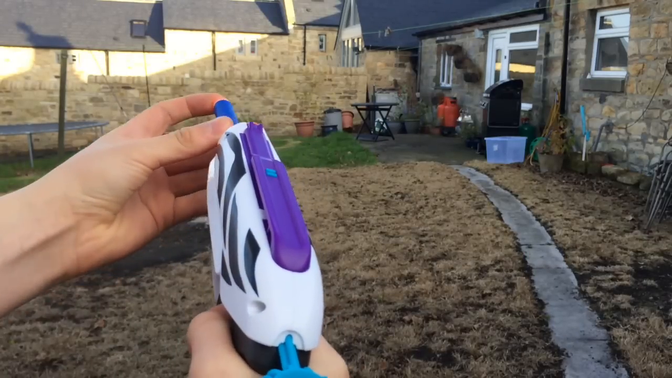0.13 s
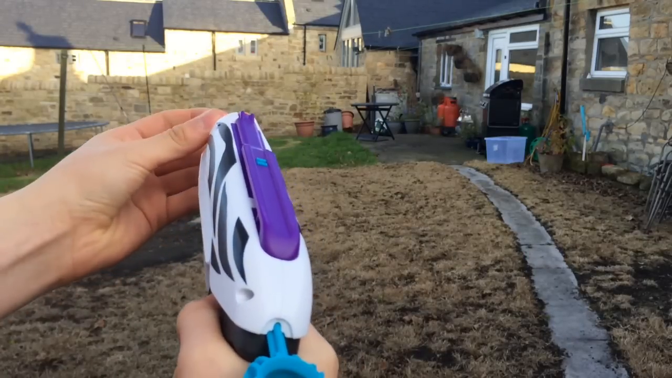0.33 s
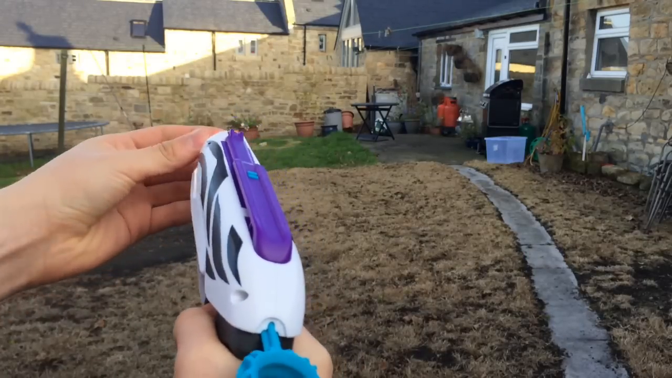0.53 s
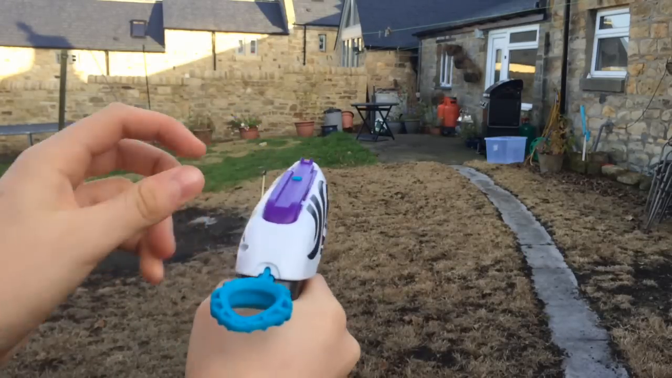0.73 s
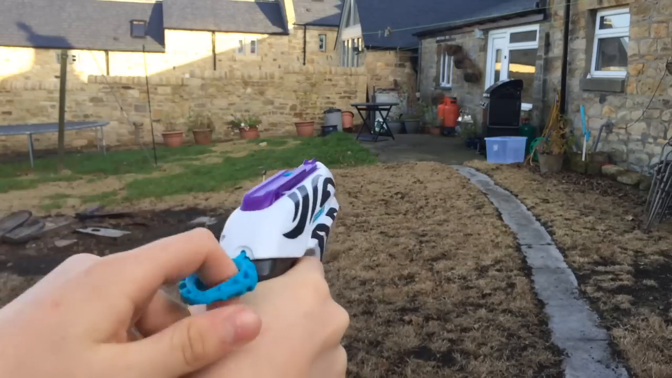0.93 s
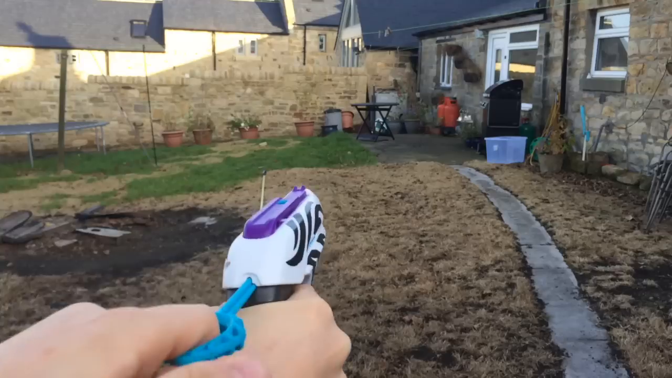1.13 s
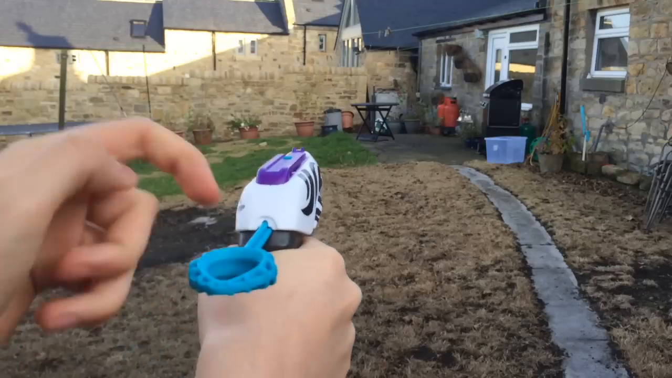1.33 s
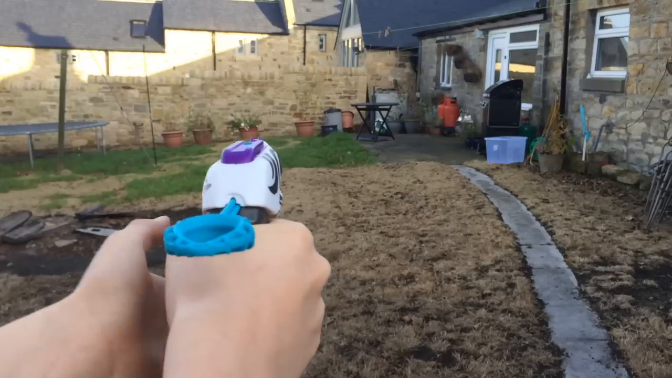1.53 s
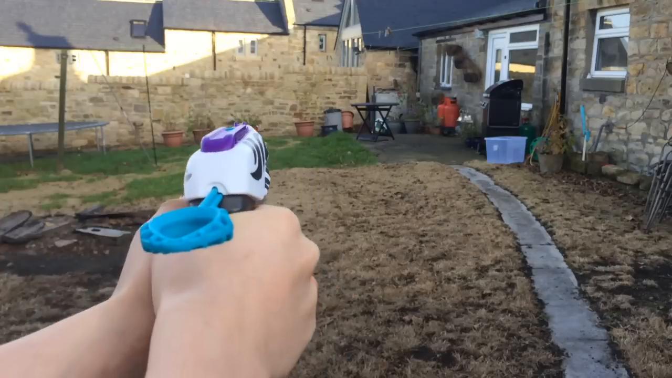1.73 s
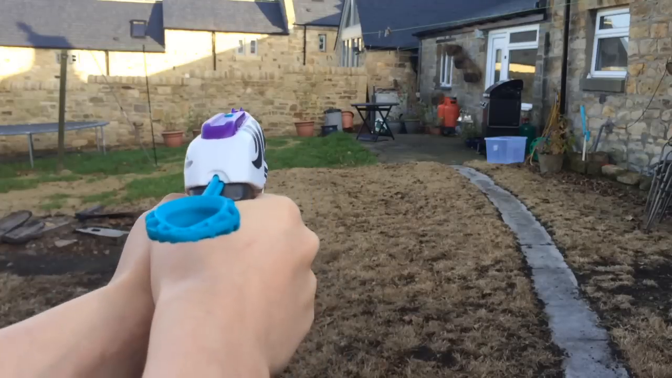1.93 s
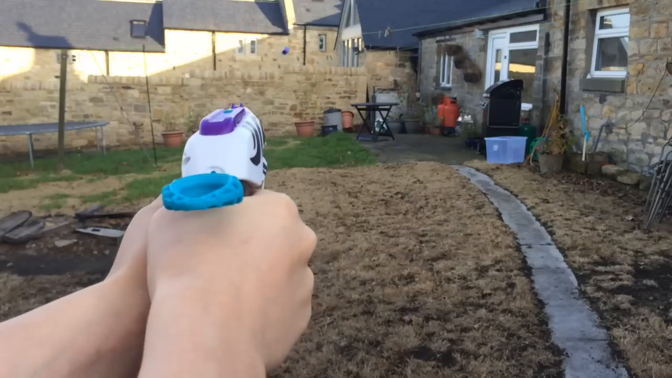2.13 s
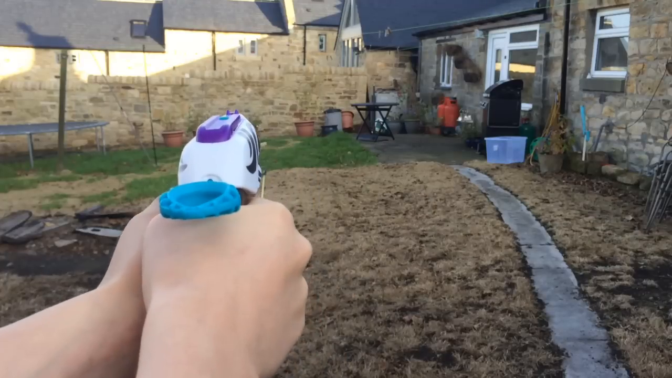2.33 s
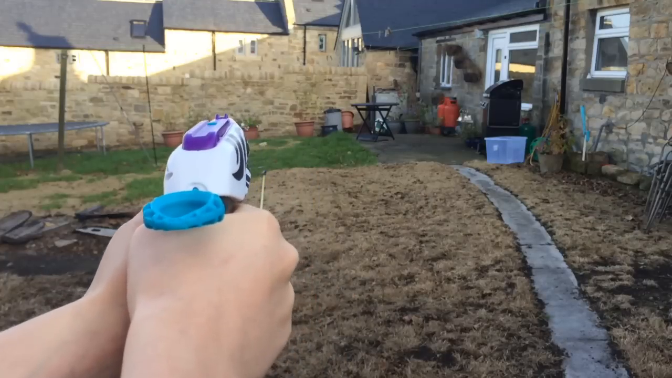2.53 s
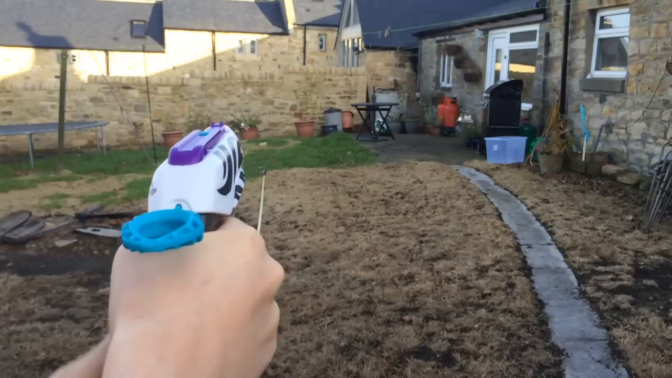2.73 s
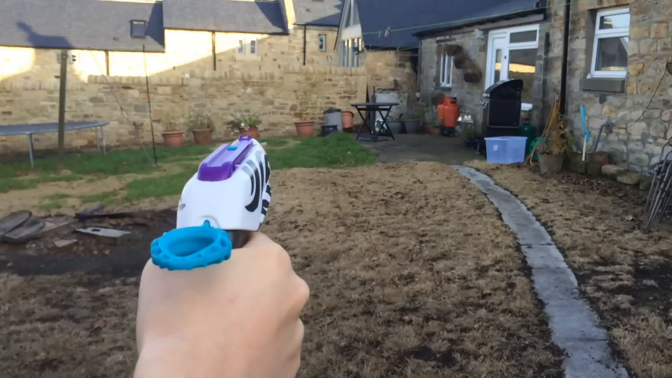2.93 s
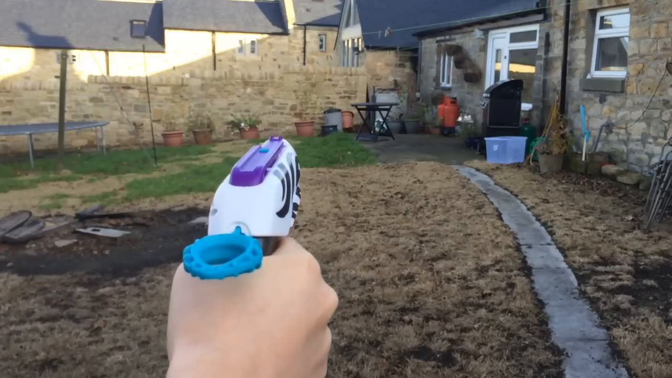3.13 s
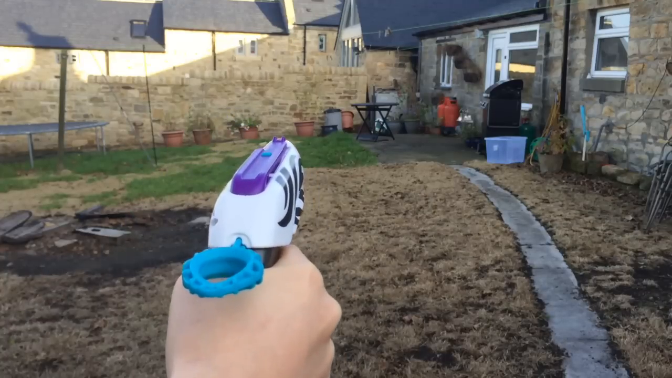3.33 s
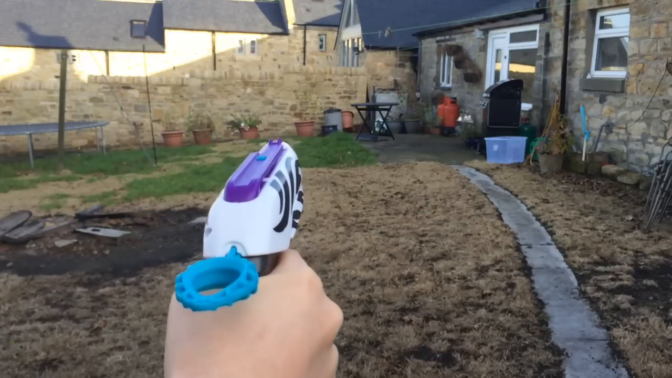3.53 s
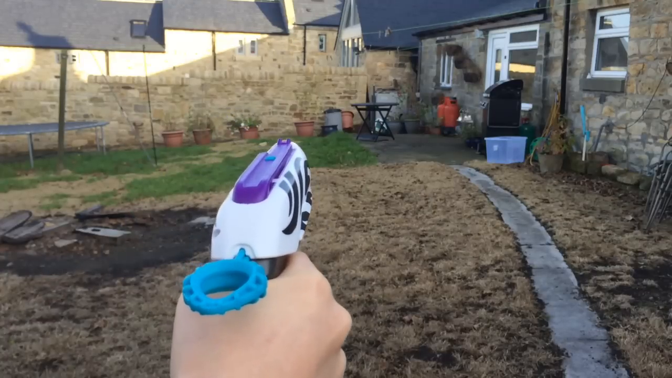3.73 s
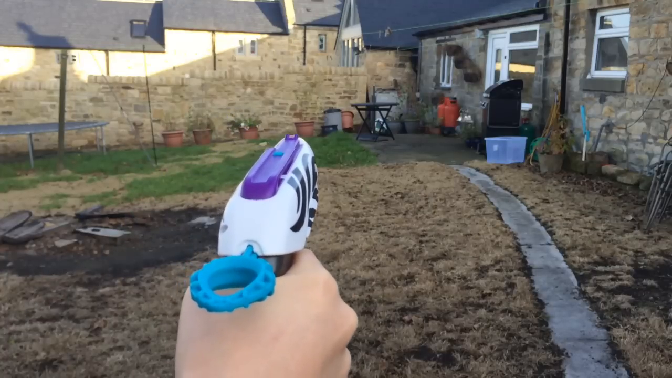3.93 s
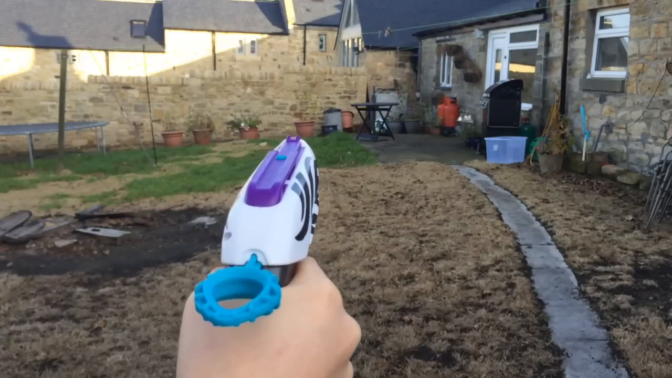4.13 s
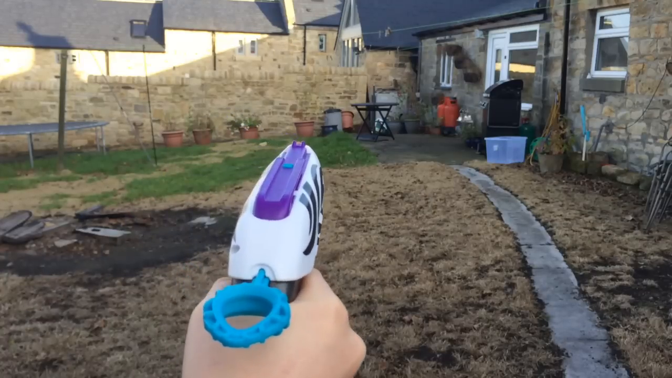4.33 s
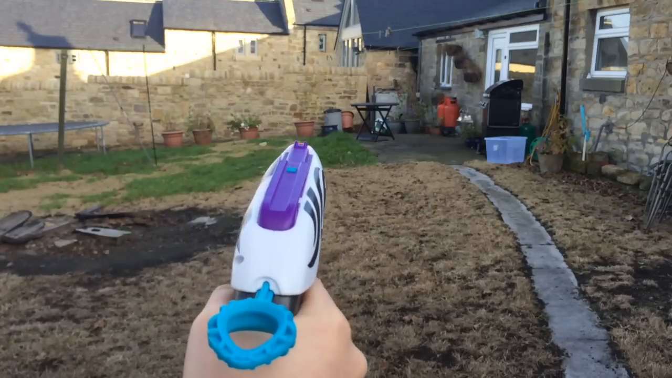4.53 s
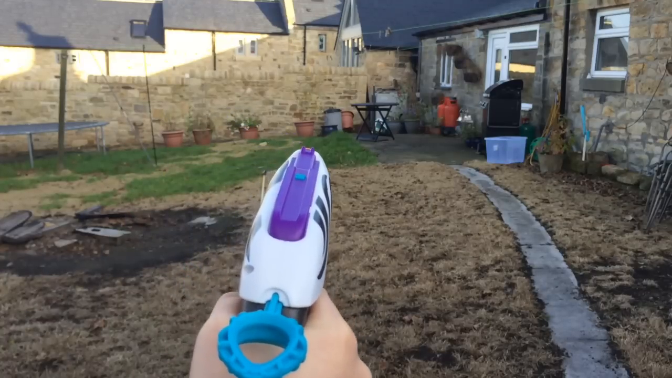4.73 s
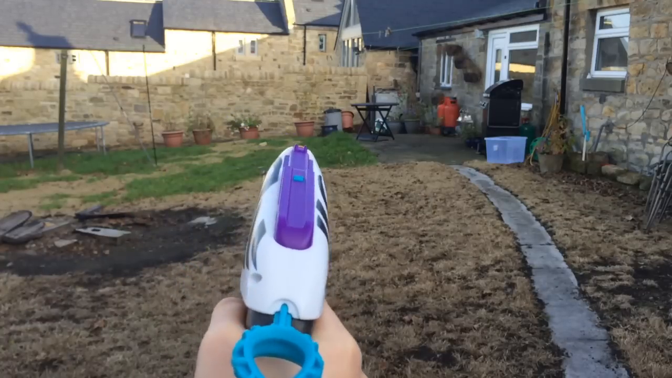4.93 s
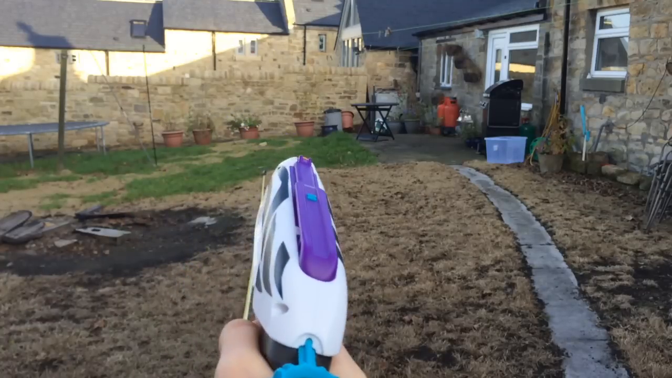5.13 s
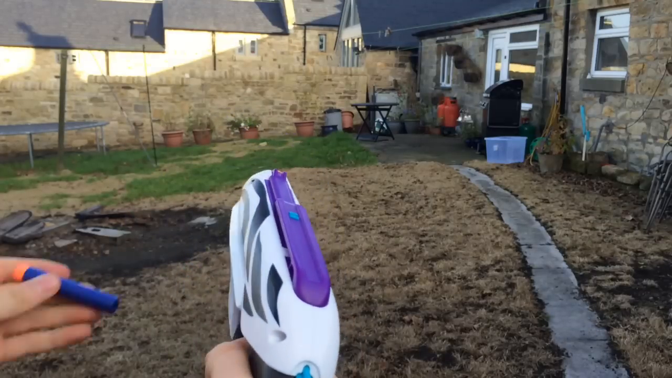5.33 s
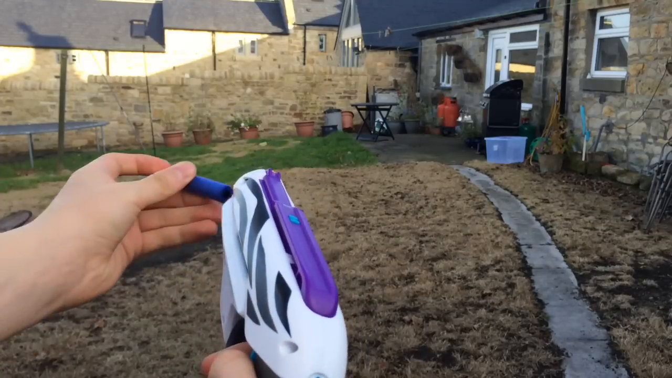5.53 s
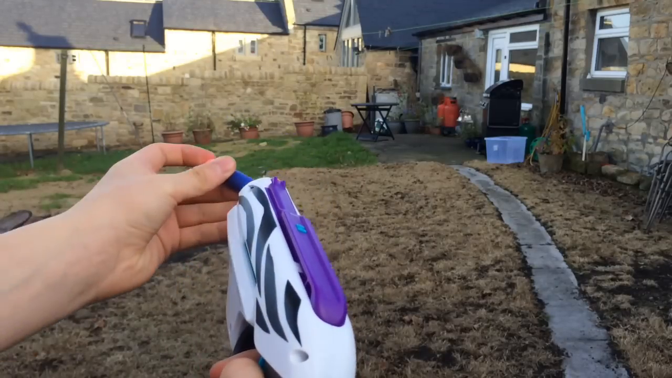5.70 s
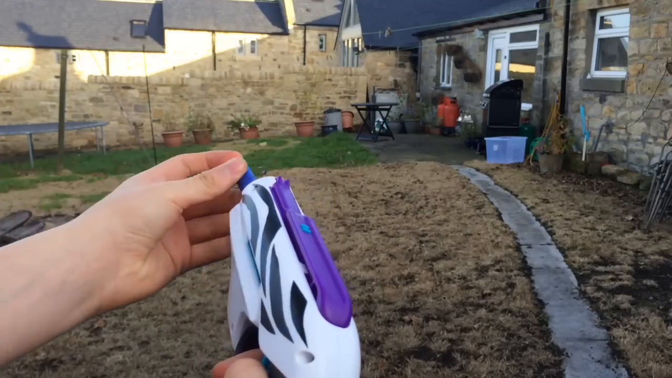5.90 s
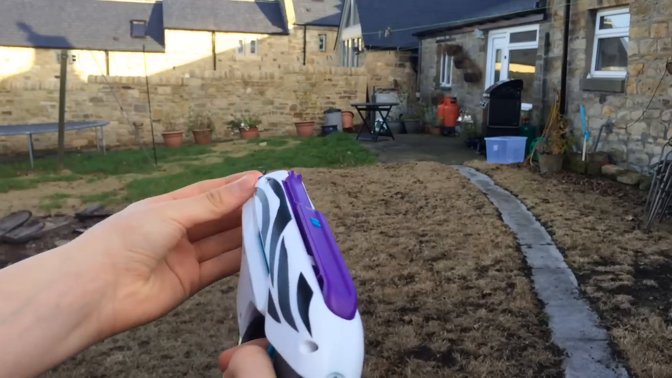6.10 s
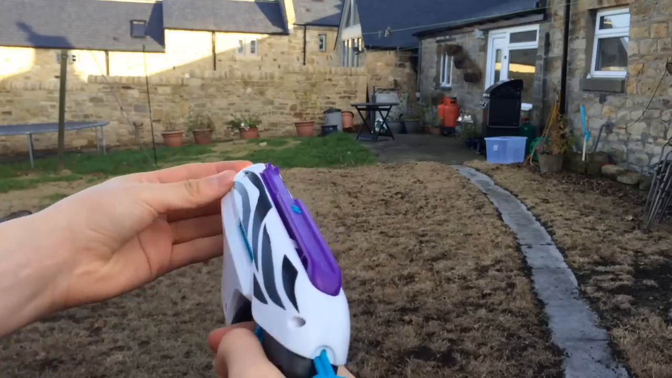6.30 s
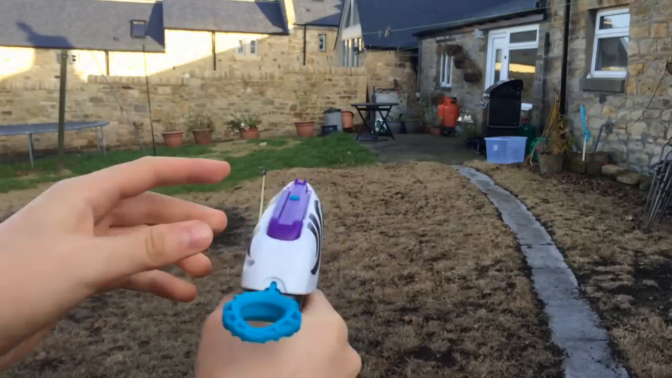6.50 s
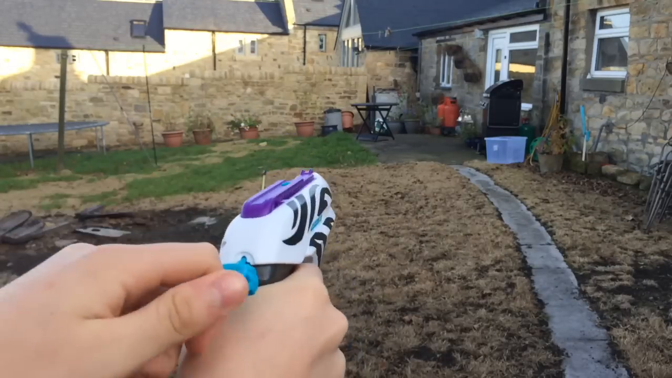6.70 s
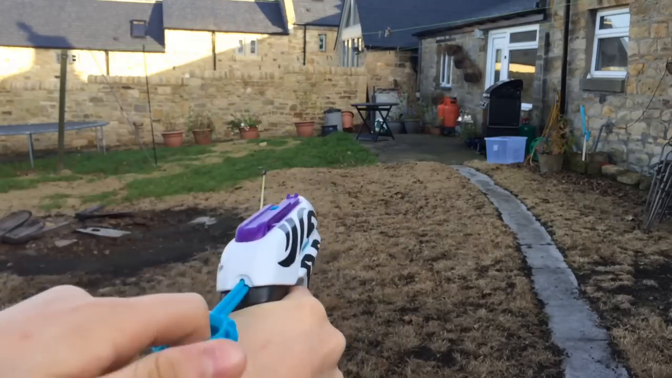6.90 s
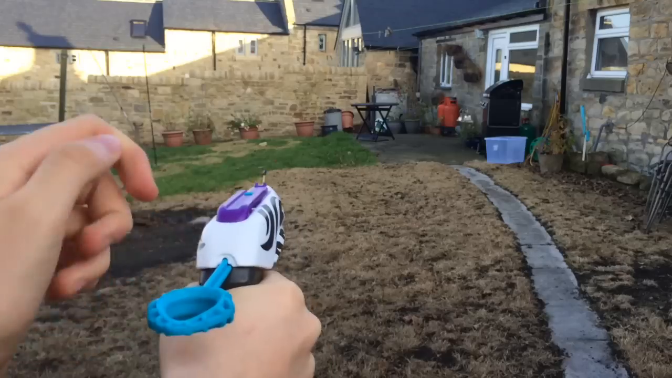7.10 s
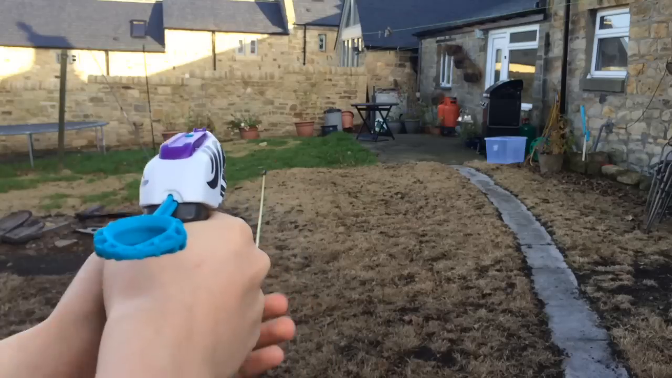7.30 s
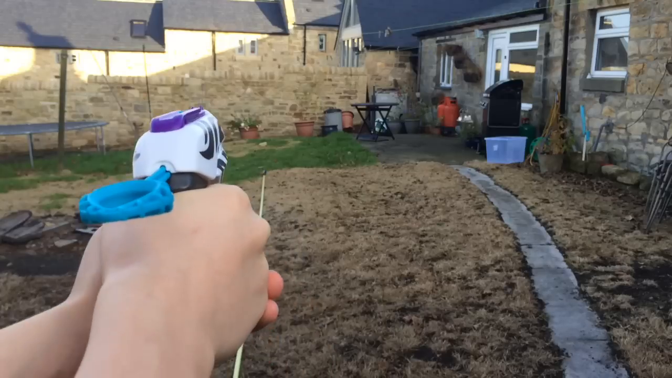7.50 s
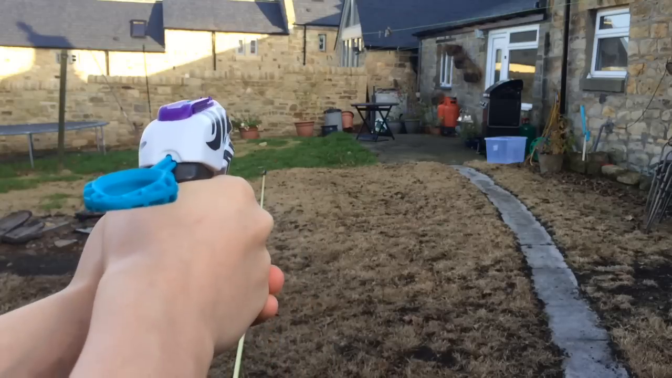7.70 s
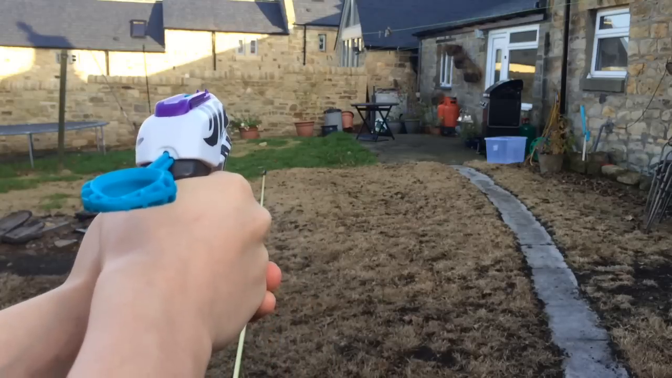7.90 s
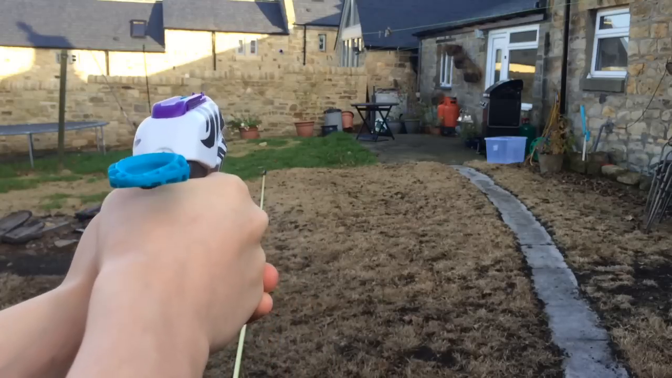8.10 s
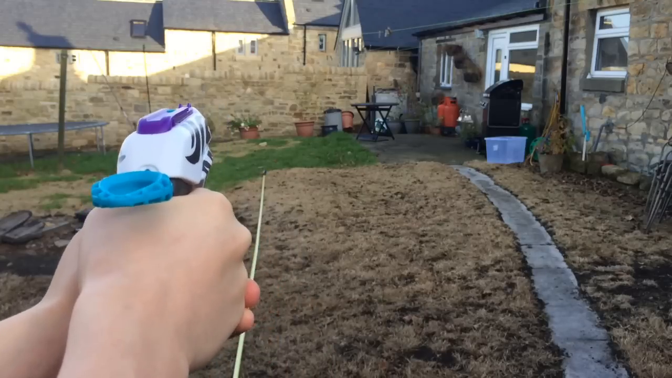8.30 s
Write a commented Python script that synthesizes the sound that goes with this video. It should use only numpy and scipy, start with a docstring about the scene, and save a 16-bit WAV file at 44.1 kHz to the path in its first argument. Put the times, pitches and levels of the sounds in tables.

```python
"""In a walled garden, far traffic hums while fingers rub, tap and load a plastic dart blaster close by.
A rod is pulled back against the spring, scraping until the catch clacks twice. At 2.2 s the blaster
fires: the plunger slams, air pops out and the spring rings on. A second later the dart lands far off.
After more handling comes a second pull at 6.9 s and a second shot at 8.1 s.
The stone walls answer the taps, clacks and shots."""
import sys
import numpy as np
from scipy import signal
from scipy.fft import rfft, irfft, next_fast_len
from scipy.io import wavfile
from scipy.ndimage import uniform_filter1d, map_coordinates

SR = 44100
rng = np.random.default_rng(int(sys.argv[2]) if len(sys.argv) > 2 else 0)


def generate_wav(sig):
    """Save sig (samples, or channels by samples) to the path in sys.argv[1] as 16-bit PCM at SR."""
    pcm = np.round(np.clip(np.atleast_2d(sig).T, -1, 1) * 32767).astype(np.int16)
    wavfile.write(sys.argv[1], SR, pcm)


N = 368235

# pulls on the rod: (time of the first clack [s], strength [dB], time stretch [factor])
PULLS = [(1.2034, 0.5, 1.05), (6.9339, 0, .95)]
# shots: (time the plunger is let go [s], strength [dB])
SHOTS = [(2.1847, 0), (8.0982, -0.6)]


def amp(db):
    """Turn decibels into a gain."""
    return 10 ** (np.asarray(db) / 20)


def unit(x):
    """Scale a signal to an average (rms) level of 1."""
    return x / np.sqrt(np.mean(x ** 2) + 1e-20)


def along(points, hz):
    """Read between (frequency, value) points on a log frequency axis."""
    freqs, values = np.transpose(points)
    return np.interp(np.log(hz + 1), np.log(freqs + 1), values)


def wobble(rate):
    """A smooth curve through `rate` random values a second."""
    return map_coordinates(rng.standard_normal(int(N * rate / SR) + 4), [np.arange(N) * rate / SR])


def filtered(x, response):
    """Filter x by a response given as a function of frequency."""
    size = next_fast_len(len(x) + 8192)
    return irfft(rfft(x, size) * response(np.fft.rfftfreq(size, 1 / SR)), size)[:len(x)]


def resonances(modes):
    """The response of a body that rings at each (pitch, width, level)."""
    return lambda f: sum(amp(db) * 1j * f * width / (hz * hz - f * f + 1j * f * width)
                         for hz, width, db in modes)


def hiss(spectrum):
    """Noise of level 1, shaped by (frequency, level) points."""
    return unit(filtered(rng.standard_normal(N), lambda hz: amp(along(spectrum, hz))))


def background():
    """Far traffic swells slowly; a breeze nudges the microphone, which hisses."""
    # traffic loudness: (time [s], rumble [dB], road hiss [dB])
    traffic = [(0.0, -59.5, -63.5), (1.0, -57.5, -61), (1.799, -60.5, -61.5), (2.44, -59, -64),
               (2.75, -59, -60.5), (3.5, -59.5, -61), (4.4, -59.5, -64.5), (5.6, -61, -66.5),
               (6.07, -58.5, -61.5), (6.5, -60.5, -65), (7.501, -61.5, -63.5), (8.35, -60.5, -64)]
    # tyre whine of single cars: (time when nearest [s], level [dB], fade [dB/s])
    passes = [(1.101, -70.5, 24), (3.49, -65.5, 44.5), (6.1, -68, 34.5), (6.95, -75.5, 15)]
    # tone colour of each noise: (frequency [Hz], relative level [dB])
    rumble_tone = [(30, -19.5), (55, -6), (110, -4), (150, -3.5), (195, -1.5), (235, -10.5), (450, -20.5),
                   (600, -44.5)]
    road_tone = [(150, -30.5), (260, -7.5), (420, -6), (600, -8), (780, -6), (950, -2), (1350, -5),
                 (2000, -12.5), (2600, -21), (4000, -25), (5500, -50)]
    whine_tone = [(1500, -38.5), (1900, 0), (2200, 2), (2550, -6.5), (3000, -38.5)]
    breeze_tone = [(12, -20), (30, -4.5), (50, -0.5), (90, -13.5), (200, -40)]
    microphone_tone = [(1500, -30), (2500, -3), (4400, 1), (6400, 2), (10000, -3), (15600, -6.5)]
    t = np.arange(N) / SR
    times, rumble_db, road_db = np.transpose(traffic)
    rumble = amp(np.interp(t, times, rumble_db) + 0.88 * wobble(6)) * hiss(rumble_tone)
    road = amp(np.interp(t, times, road_db) + 0.9 * wobble(15)) * hiss(road_tone)
    cars = amp(-85) + sum(amp(db - fade * np.abs(t - nearest)) for nearest, db, fade in passes)
    whine = cars * amp(1.2 * wobble(6)) * hiss(whine_tone)
    breeze = amp(-74.5 + 3.8 * wobble(3) + 4.4 * wobble(7.8)) * hiss(breeze_tone)
    return rumble + road + whine + breeze + amp(-77) * hiss(microphone_tone)


def rubbing(edge_ms=25):
    """Skin and foam slip unevenly over the plastic, the tone shifting in patches."""
    # rubs: (start [s], length [s], level [dB], swell from start to end [dB])
    rubs = [(0.0, 0.048, -65, -1), (.1, 0.051, -59, -5), (.288, 0.025, -49.5, 3), (.365, 0.085, -62, 7),
            (.665, 0.064, -70, 6), (.86, 0.21, -72.5, 6), (1.08, 0.052, -68, 13), (1.37, 0.044, -66.5, 6),
            (1.73, 0.09, -71, -7), (2.74, 0.068, -69.5, 10), (3.3, 0.42, -73.5, -2.5), (4.69, .23, -75, -8),
            (5.0, .11, -74.5, -2.3), (5.135, 0.14, -69.5, -5), (5.43, 0.071, -67, 3), (5.82, .035, -70, 10),
            (5.965, 0.051, -64.5, -6), (6.01, .1, -52.5, 7), (6.125, .075, -60, 5),
            (6.405, 0.066, -64, 6.5), (6.75, 0.078, -69.5, -9.5), (7.445, .065, -68, -1.5)]
    # tone colour of sliding skin: (frequency [Hz], relative level [dB])
    skin_tone = [(1200, -14), (2000, 4), (3000, -4), (5300, -0.5), (7500, -1), (9700, -6), (12000, -5),
                 (15500, -7.5)]
    t, gain = np.arange(N) / SR, np.zeros(N)
    for start, length, db, swell_db in rubs:
        progress = (t - start) / length
        gain += amp(db + swell_db * (np.clip(progress, 0, 1) - 0.5)) * (progress > 0) * (progress < 1)
    gain = np.abs(uniform_filter1d(gain, size=round(edge_ms * SR / 1000)))
    spectra = signal.stft(hiss(skin_tone), nperseg=256)[2]
    patches = uniform_filter1d(rng.standard_normal(spectra.shape), size=5, axis=0)
    patches = uniform_filter1d(patches, size=10, axis=1)
    skin = signal.istft(spectra * amp(3 * unit(patches)), nperseg=256)[1][:N]
    return gain * unit(skin * amp(2.5 * wobble(60) + 1.4 * wobble(300)))


def plastic(f, scatter_db=0):
    """The shell's response: its ringing pitches over a broad click without bass or extreme treble."""
    # resonances of the shell: (pitch [Hz], width [Hz], level [dB])
    shell = [(1044, 220, -1), (1970, 160, -1.5), (2126, 82, -2.5), (3000, 680, -8), (3660, 310, -2.5),
             (4500, 910, -7), (6200, 770, -4.5), (7150, 80, -5), (9500, 410, -12.5), (10900, 1000, -15)]
    modes = [(hz, width, db + scatter_db * rng.standard_normal()) for hz, width, db in shell]
    click = amp(-8.5) * (1j * f / (800 + 1j * f)) ** 2 * (13000 / (13000 + 1j * f)) ** 2
    return resonances(modes)(f) + click


def contacts(rows):
    """Each hit is a burst of chatter through the shell and a dull knock in the grip."""
    # hollow of the grip: (pitch [Hz], width [Hz], level [dB])
    hollow = [(400, 320, 8), (810, 1200, -4.5)]
    out, t = np.zeros(N + SR), np.arange(4096) / SR
    thin = lambda f: (1j * f / (520 + 1j * f)) ** 2  # a small shell gives off no bass
    peak = lambda x: np.sqrt(uniform_filter1d(x * x, size=60).max())
    for start, db, rise_ms, fade_ms, hz, ring_db, bright_db, knock_db in rows:
        rise = (1 - np.exp(-t * 1000 / max(rise_ms, 0.05))) ** 2
        burst = rng.standard_normal(len(t)) * amp(-60 * t * 1000 / fade_ms) * rise
        tilt = lambda f: amp(bright_db * np.log2(np.clip(f, 800, SR) / 3000))
        chatter = filtered(burst, lambda f: plastic(f, scatter_db=1.5) * tilt(f) * thin(f))
        # one clean blow sets the struck spot ringing at its own pitch
        blow = np.linalg.norm(burst) * (np.arange(len(t)) == round(2 * rise_ms * SR / 1000))
        spot = resonances([(hz, hz * 0.096, ring_db)])
        clack = chatter + filtered(0.798 * blow + 0.58 * burst, lambda f: spot(f) * thin(f))
        knock = filtered(burst, resonances(hollow))
        hit = clack / peak(clack) + amp(knock_db) * knock / peak(knock)
        out[round(start * SR):][:len(t)] += amp(db) * hit
    return out[:N]


def tapping(rise_ms=0.32, bright_db=-6.5):
    """Fingers, dart and pull-ring tap the shell."""
    # taps: (time [s], level [dB], time to fade 60 dB [ms], pitch [Hz], ring [dB], knock [dB])
    taps = [(0.295, -41.5, 30, 6740, -3, -3), (0.307, -47.5, 23, 5360, -2, 11.5),
            (0.317, -48, 15, 3060, 6, 2.5), (.654, -52.5, 22, 5100, -3, -18),
            (0.71, -62, 24, 7900, -5, 11.5), (0.75, -47.5, 10, 3000, 3, -20),
            (0.754, -42, 25, 1850, 17, -28), (0.936, -39, 12, 1930, 37, -33),
            (1.1372, -37.5, 12, 6500, 6, -17.5), (1.2746, -33, 23, 4500, 9, 2.5),
            (1.281, -37, 22, 1010, 15, -6), (1.4244, -45.5, 16, 6000, 6, -29),
            (1.723, -61, 27, 10840, 9, -27), (1.821, -59, 28, 6550, -3, -25),
            (1.883, -62, 12.6, 4510, 8, -15), (3.725, -58, 20.5, 6500, 7.5, -25),
            (5.255, -57.5, 25, 8850, 9.5, -25.5), (5.4196, -51.5, 8.8, 4500, 8, -17),
            (5.86, -57, 20, 8040, 3, -26), (5.956, -43, 18.4, 960, 36, -20),
            (6.012, -51, 36, 1480, 5.4, -12), (6.099, -40.5, 15, 2060, 10, -12),
            (6.4857, -34, 22, 2120, 15.5, -11), (6.9972, -29.5, 16.5, 1020, 7, 0)]
    return contacts([(start, db, rise_ms, fade_ms, hz, ring_db, bright_db, knock_db)
                     for start, db, fade_ms, hz, ring_db, knock_db in taps])


def rod_scrape():
    """The rod scrapes grainily along its guide, harder as the spring tightens."""
    # scrape loudness: (delay from the first clack before stretching [ms], relative level [dB])
    drag = [(-52.5, -47.5), (-15.5, -38.5), (-6, -27)]
    delays_ms, levels_db = np.transpose(drag)
    t, gain = np.arange(N) / SR, np.zeros(N)
    for start, db, stretch in PULLS:
        gain += amp(db + np.interp(t, start + stretch * delays_ms / 1000, levels_db, -200, -200))
    grit = rng.standard_normal(N) * amp(2.1 * wobble(290))
    return np.abs(uniform_filter1d(gain, size=200)) * amp(-6.5) * unit(filtered(grit, plastic))


def catch_clacks():
    """Each pull makes a few light clicks, then the catch clacks twice."""
    # hits of one pull: (delay before stretching [ms], level [dB], rise [ms], time to fade 60 dB [ms],
    # pitch [Hz], ring [dB], brightness [dB/octave], knock [dB])
    hits = [(-50, -35.5, 0.76, 80, 2100, 13.5, -6.5, -23.5), (-25.5, -39.5, 1.3, 16, 2900, 3.5, -6.5, 7.5),
            (-10.5, -22.5, 1.8, 23, 4500, 7.5, 0, -27.5), (1, -11.5, 0.64, 22, 2900, 4, -0.9, -26.5),
            (8.3, -8.5, 1.8, 19, 1010, 7, -1.26, -20.5)]
    return contacts([(start + stretch * ms / 1000, strength_db + db, *tone)
                     for start, strength_db, stretch in PULLS for ms, db, *tone in hits])


def plunger_slam():
    """The trigger clicks, the plunger slams and the blaster rattles."""
    # hits of one shot: (delay [ms], level [dB], rise [ms], time to fade 60 dB [ms],
    # pitch [Hz], ring [dB], brightness [dB/octave], knock [dB])
    hits = [(-18, -53, .5, 16, 3100, 6, -1, -18.5), (-10.5, -38.5, .26, 13, 2900, 5, -4.5, -9),
            (0.5, -7.5, 0.45, 17, 2970, 3.5, -3, -20.5), (7, -15, 0.78, 23, 2400, 9, -9, -7),
            (14.5, -8, .17, 16, 6260, 5.3, -1, -23.5), (27, -21.5, 0.27, 18, 2700, 6, 0, -21.5),
            (31.5, -20, .28, 15, 2500, 6.4, -1, -29), (37, -28, 0.66, 25, 2000, 14, -4.5, -18.5),
            (43.5, -30, .52, 10, 4300, 4.5, -3, -19.5)]
    return contacts([(start + ms / 1000, strength_db + db, *tone)
                     for start, strength_db in SHOTS for ms, db, *tone in hits])


def air_and_spring(push_delay_ms=1.85, push_ms=7.05, pop_delay_ms=7.6, bass_hz=50):
    """The plunger pushes one wave of pressure, the dart pops out and the spring rings on."""
    # tones of the spring: (pitch [Hz], level [dB], time to fade 60 dB [s])
    spring = [(160, -27, 0.23), (190, -41, 0.25), (474, -41, 0.43), (608, -41.5, 0.37), (813, -43, 0.27),
              (862, -52, 1.9), (982, -42, 0.27), (1061, -43.5, 0.59), (1099.6, -54.5, .9)]
    out, t = np.zeros(N + SR), np.arange(SR) / SR
    cycle = np.minimum(t * 1000 / push_ms, 1)
    push = amp(-9.8) * np.sqrt(cycle) * np.sin(2 * np.pi * cycle)  # builds as the plunger speeds up
    pop = amp(-6.5) * np.exp(-((t * 1000 - pop_delay_ms) / 0.42) ** 2)
    for start, strength_db in SHOTS:
        ring = np.zeros(SR)
        for hz, db, fade_s in spring:
            chafe_db = rng.normal(0, 2.2) + 2.3 * wobble(35)[:SR]  # the coils chafe and beat
            ring += amp(db + chafe_db - 60 * t / fade_s) * np.sin(2 * np.pi * (hz * t + rng.random()))
        ring *= 1 - np.exp(-t / 0.0072)
        out[round((start + push_delay_ms / 1000) * SR):][:SR] += amp(strength_db) * (push + pop + ring)
    return filtered(out[:N], lambda f: 1j * f / (bass_hz + 1j * f))  # the microphone loses deep bass


def dart_landing():
    """The first dart lands far off and bounces."""
    # hits: (time [s], level [dB], rise [ms], time to fade 60 dB [ms],
    # pitch [Hz], ring [dB], brightness [dB/octave], knock [dB])
    hits = [(3.2405, -43.5, 0.27, 28, 3570, 4, -8.5, -1), (3.255, -45.5, 4.9, 98, 1270, 31, -16, -10)]
    return contacts(hits)


def garden(x, near_db, echo_dbs):
    """Ground and fence scatter the sound, treble dying first; two walls then send blurred echoes."""
    # nearby reflections: (frequency [Hz], time to fade 60 dB [s])
    fade_times = [(200, 0.22), (700, 0.33), (2000, 0.23), (5000, 0.2), (9000, 0.18), (14000, 0.13)]
    # house wall and far wall: (delay [s], time to fade 20 dB [s], treble lost above [Hz])
    walls = [(.088, .035, 5000), (.186, .03, 7000)]
    hz, t, spectra = signal.stft(rng.standard_normal(SR // 2), SR, nperseg=256)
    shape = amp(near_db - 60 * t / along(fade_times, hz)[:, None])
    for (delay, fade_s, loss_hz), db in zip(walls, echo_dbs):
        age = np.clip(t - delay, 0, 1)
        echo = amp(db - 20 * age / fade_s) * (1 - np.exp(-age / 0.0073))
        shape += echo / (1 + (hz[:, None] / loss_hz) ** 2)
    tail = signal.istft(spectra * shape, SR, nperseg=256)[1]
    return signal.fftconvolve(x, np.pad(tail, (200, 0)))[:N]


def scene():
    """Mix the blaster, its echoes, the hands and the background into one channel."""
    priming = catch_clacks() + rod_scrape()
    slam, taps, air, landing = plunger_slam(), tapping(), air_and_spring(), dart_landing()
    echoes = (garden(priming, near_db=-51.5, echo_dbs=[-52, -63])
              + garden(slam, near_db=-42.5, echo_dbs=[-58, -66])
              + garden(air, near_db=-54.5, echo_dbs=[-68, -78])
              + garden(taps, near_db=-47.5, echo_dbs=[-66, -76])
              + garden(landing, near_db=-33.5, echo_dbs=[-60, -70]))
    return (taps + priming + slam + air + landing + echoes + rubbing() + background())[None]


def record(dry):
    """Round off the loudest peaks and cut the highest treble steeply."""
    ceiling, top_hz = 1.1, 15350
    soft = dry[0] / (1 + np.abs(dry[0] / ceiling) ** 6) ** (1 / 6)
    return filtered(soft, lambda hz: 1 / np.sqrt(1 + (hz / top_hz) ** 240))[None]


dry = scene()
out = record(dry)
generate_wav(out)
```